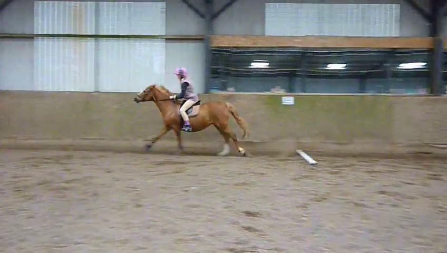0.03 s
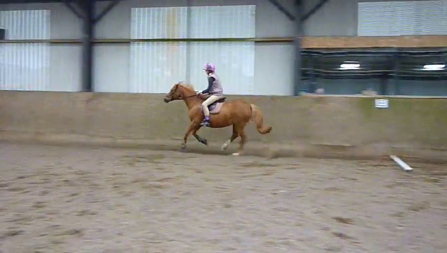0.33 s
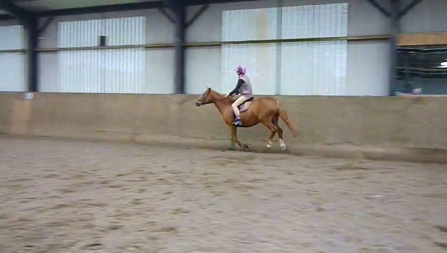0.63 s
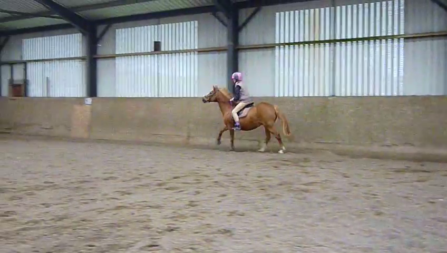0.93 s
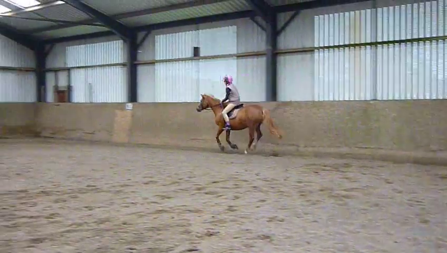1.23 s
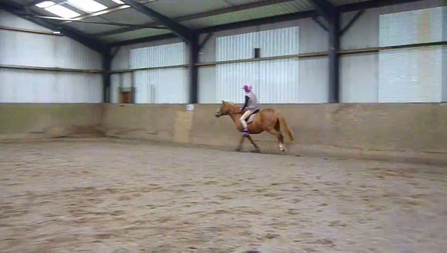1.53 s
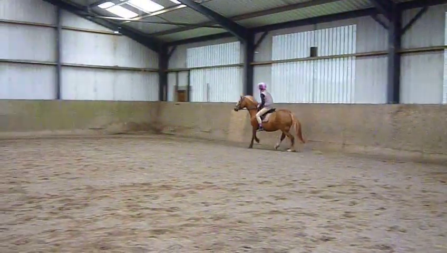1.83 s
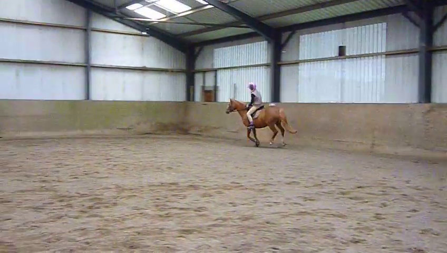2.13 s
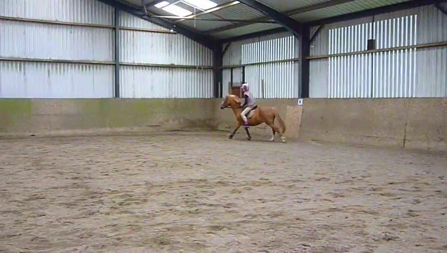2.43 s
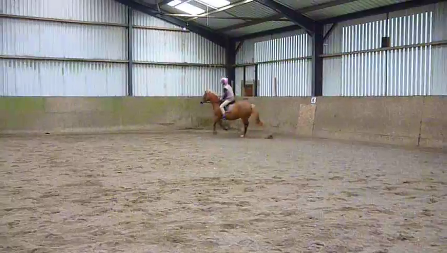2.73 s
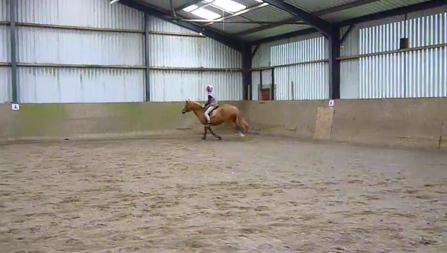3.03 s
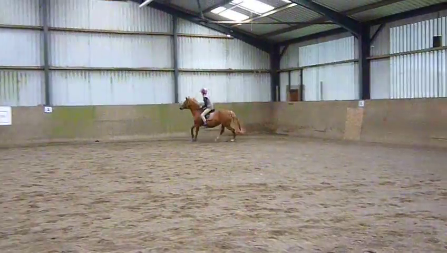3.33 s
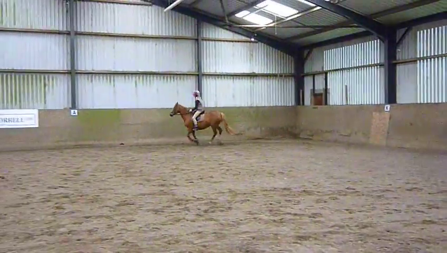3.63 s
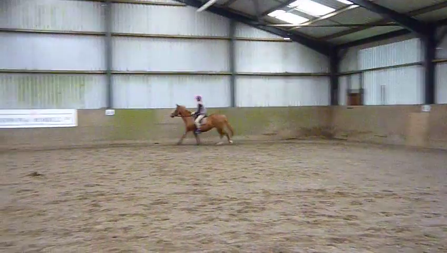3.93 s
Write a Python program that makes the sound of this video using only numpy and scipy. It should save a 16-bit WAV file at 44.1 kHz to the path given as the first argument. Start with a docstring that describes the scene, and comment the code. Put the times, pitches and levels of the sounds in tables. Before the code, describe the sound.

A pony canters on packed sand, about two strides a second, with dull thuds and soft scuffs. At about 0.2 seconds a clod knocks on the boards. The heaviest steps land around 1 second, echoing into a low rumble in the hall. The hoofbeats then grow unevenly fainter until 4 seconds, briefly stronger near 2.5. Light tack ticks and a steady, rain-like wash from the roof continue throughout.

```python
"""An even wash of noise from the roof fills a steel riding hall with a sand floor.
From the first moment a pony canters away along the wall, about two strides a second: each hoof thuds
in the packed footing and throws up sand. Early on a clod knocks on the boards; the tack ticks throughout.
The heaviest steps land after about a second, and the hall draws them out into a rumble.
Then the hoofbeats grow unevenly fainter while the wash carries on."""
import sys
import numpy as np
from scipy import signal
from scipy.fft import rfft, irfft
from scipy.io import wavfile
from scipy.ndimage import uniform_filter1d

SR = 44100
rng = np.random.default_rng(int(sys.argv[2]) if len(sys.argv) > 2 else 0)


def wav_record(signal):
    """Record a signal, one row per channel, as 16-bit PCM in the file named by sys.argv[1]."""
    frames = np.transpose(np.atleast_2d(signal))
    bounded = np.clip(frames, -1, 1)
    # unit amplitude maps onto the largest positive 16-bit level
    quanta = np.round(bounded * 32767).astype(np.int16)
    wavfile.write(sys.argv[1], SR, quanta)


N = 4 * SR
BIN_HZ = np.arange(N // 2 + 1) * SR / N


def undb(db):
    """The decibel scale: 20 dB is a factor of ten in amplitude."""
    return 10 ** (np.asarray(db) / 20)


def unit_rms(x):
    """Normalisation to an rms of 1."""
    return x / np.sqrt(np.mean(x ** 2))


def on_log(points, hz):
    """Interpolation of (frequency_hz, value) points on a log-frequency axis."""
    points_hz, values = np.array(points, float).T
    return np.interp(np.log(hz + 1e-3), np.log(points_hz), values)


def since(start_s):
    """Causal time: seconds after an onset, 0 before it."""
    return np.maximum(np.arange(N) / SR - start_s, 0)


def burst(start_s, rise_s, decay_s):
    """Exponential decay after a smooth attack, with a peak of 1."""
    t = since(start_s)
    envelope = (1 - np.exp(-(t / rise_s) ** 2)) * np.exp(-t / decay_s)
    return envelope / (envelope.max() + 1e-12)


def swell(start_s, rise_s, sharpness=4.2):
    """A gamma envelope: a rounded push that peaks at 1 after the rise time."""
    t = since(start_s) / rise_s
    return (t * np.exp(1 - t)) ** sharpness


def drift(rate_hz):
    """Random modulation: straight glides between Gaussian values, with a spread near 1."""
    span = int(SR / rate_hz)
    steps = np.repeat(rng.standard_normal(N // span + 1), span)
    return 1.28 * uniform_filter1d(steps, span)[:N]


def noise(spectrum, grain_db=0, transpose=1):
    """Spectral shaping of noise, rms 1; grain makes it a patter of uneven particles."""
    particles = rng.standard_normal(N) * undb(grain_db * rng.exponential(size=N))
    colour = undb(on_log(spectrum, BIN_HZ / transpose))
    high_pass = BIN_HZ ** 2 / (BIN_HZ ** 2 + 20 ** 2)
    return unit_rms(irfft(rfft(particles) * colour * high_pass, N))


def resonance(hz, width_hz):
    """Random excitation of two like resonators in series: a steep-sided noise band of rms 1."""
    peak = signal.iirpeak(hz, hz / width_hz, fs=SR)
    band = signal.lfilter(*peak, rng.standard_normal(N))
    return unit_rms(signal.lfilter(*peak, band))


# Spectrum of the wash: frequency_hz, density_db
WASH_SPECTRUM = [(21, -32.5), (35, -19), (54, -21), (85, -11), (120, -5), (200, -2), (310, -6), (420, -9),
                 (620, -10.5), (850, -12.5), (1100, -14), (1450, -14.5), (1800, -16), (2300, -19),
                 (2900, -22.5), (4300, -25), (6000, -26.5), (8000, -29)]
# Faint resonances of the hall: centre_hz, width_hz, level_db
HALL_RESONANCES = [(1422, 200, -65), (2420, 130, -75.5)]
# Slow contour of the wash: time_s, gain_db
WASH_CONTOUR = [(0, 6), (.1, 2), (0.301, 4.5), (.5, 1.5), (0.901, 1.5), (1.25, 2.5), (1.7, 1.8), (2.2, 1),
                (3.301, 0.5), (3.899, 1), (4, 1.5)]


def roof_wash():
    """Broadband noise with resonance: a finely grained wash from the roof rings faintly in the hall."""
    level_db = -47 + 0.5 * drift(rate_hz=20)
    wash = undb(level_db) * noise(WASH_SPECTRUM, grain_db=2.22)
    ringing = sum(undb(db) * resonance(hz, width_hz) for hz, width_hz, db in HALL_RESONANCES)
    contour_db = np.interp(since(0), *np.array(WASH_CONTOUR).T)
    return (wash + ringing) * undb(contour_db)


# Deep swells in the hall: start_s, level_db, rise_s
RUMBLES = [(.46, -52.5, 0.13), (.92, -47.5, 0.077), (1.08, -50.5, 0.14), (3.5, -56.5, 0.046)]


def hall_rumble():
    """Low-frequency resonance: the hall swells with a rumble around some of the strides."""
    envelope = sum(undb(db) * swell(start_s, rise_s) for start_s, db, rise_s in RUMBLES)
    return resonance(hz=97.5, width_hz=40) * envelope


# Reverberation time of the hall: frequency_hz, t60_s
REVERB_TIMES = [(80, 0.78), (200, 1.3), (500, 0.89), (1500, 0.36), (4000, 2.6), (9000, .5)]


def reverberation(sound):
    """Convolution with a diffuse tail, in which each octave band decays at its own rate."""
    t = since(0.012)  # delay of the first reflection
    white, tail = rfft(rng.standard_normal(N)), 0
    octave = np.clip(np.log2((BIN_HZ + 1) / 62.5), 0, 7)
    for k in range(8):
        band = irfft(white * np.maximum(1 - abs(octave - k), 0), N)
        t60_s = on_log(REVERB_TIMES, 62.5 * 2 ** k)
        tail += band * np.exp(-np.log(1000) * t / t60_s)
    tail *= 1 - np.exp(-t / 0.013)  # the reflections build up
    bass = rfft(tail)[(BIN_HZ > 100) & (BIN_HZ < 500)]
    bass_gain = np.sqrt(np.mean(abs(bass) ** 2))
    return signal.fftconvolve(sound, tail / bass_gain)[:N] * undb(-1.5)


# Scuffs, rustles and a squeak: start_s, level_db, centre_hz, width_hz, rise_s
RUBS = [(0, -44.5, 2220, 140, 0.016), (0, -55, 2200, 600, 0.13), (.15, -49, 600, 202, 0.065),
        (.3, -52, 900, 1500, 0.03), (.645, -50, 930, 160, 0.025), (.66, -59, 6400, 3500, 0.052),
        (1.06, -52, 600, 640, 0.077), (1.125, -48.5, 806, 700, 0.019), (1.13, -64, 4500, 447, 0.14),
        (1.545, -43, 387, 198, 0.015), (1.56, -53.5, 1460, 896, 0.14), (2.52, -56, 650, 302, 0.049),
        (2.97, -51.5, 330, 350, 0.1), (3.044, -52.5, 1390, 1000, 0.046), (3.515, -50, 520, 450, 0.057),
        (3.671, -52, 1310, 400, .045), (3.94, -55.5, 3970, 4530, 0.039)]


def scuffs():
    """Friction: sand and tack rub softly in bands of noise that swell and fade."""
    return sum(undb(db) * swell(start_s, rise_s) * resonance(hz, width_hz)
               for start_s, db, hz, width_hz, rise_s in RUBS)


def cracks(contacts, spectrum):
    """Impact transients: each hard contact gives a sudden burst of noise that dies quickly."""
    rise_s = 0.000055
    envelope = sum(undb(db) * burst(start_s, rise_s, decay_s) for start_s, db, decay_s, *_ in contacts)
    return noise(spectrum) * envelope


# Contacts of tack and grit: start_s, level_db, decay_s
TACK_CONTACTS = [(.1406, -49.5, 0.01), (.1989, -50, .002), (.2443, -49, .014), (.6155, -47, 0.0042),
                 (.7532, -45, .004), (1.195, -53.5, .015), (1.9056, -46.5, 0.024), (2.077, -52, 0.0017),
                 (2.4783, -49, 0.0055), (2.6663, -47, 0.0033), (2.728, -47, 0.0014), (3.7673, -48.5, .002)]
# Spectrum of a tick: frequency_hz, density_db
TICK_SPECTRUM = [(500, -31), (2000, -7.5), (3800, 0.5), (5500, 1.5), (7000, -0.5), (9000, -5)]


def tack_ticks():
    """Brief contact makes a bright sound: tack and grit tick in the treble."""
    return cracks(TACK_CONTACTS, TICK_SPECTRUM)


# Clod impacts on the boards: start_s, level_db, crack_decay_s, knock_gain_db
CLOD_IMPACTS = [(.2272, -28, 0.0035, 0), (.2355, -34, 0.011, -5), (.2445, -38, 0.009, -5)]
# Spectrum of their crack: frequency_hz, density_db
CLOD_SPECTRUM = [(100, -17), (400, 13), (750, 8), (950, -1), (1450, 6.5), (1800, -24.5), (2400, 3.5),
                 (3000, -10.5), (4300, -15.5), (6000, -21), (9000, -30)]
# Modes of the boards: frequency_hz, gain_db, t60_s
WALL_MODES = [(620, -5, .022), (1480, 0, .018), (2480, -3, .012), (4100, -10, .007)]


def clod_on_boards():
    """Modal vibration: each impact cracks and knocks the boards into a short, damped ring."""
    ringing = 0
    for start_s, db, _, knock_db in CLOD_IMPACTS:
        t = since(start_s)
        for hz, mode_db, t60_s in WALL_MODES:
            decay = np.exp(-np.log(1000) * t / t60_s)
            ringing += undb(db + knock_db + mode_db) * np.sin(2 * np.pi * hz * t) * decay
    return cracks(CLOD_IMPACTS, CLOD_SPECTRUM) + ringing


# Hoof falls: start_s, level_db, pitch_hz, sink_s, crunch_gain_db, hall_gain_db
HOOF_FALLS = [(0.048, -46, 297, 0.021, 7, -2.5), (0.128, -33.5, 231, 0.012, -3, 0),
              (0.173, -37.5, 139, 0.013, -11, -3.5), (0.222, -36.5, 113.5, 0.016, -0.5, -10.5),
              (0.268, -37, 289, 0.015, -5, -5.5), (0.448, -37.5, 149, 0.011, 3.5, -2.5),
              (0.486, -43, 331, 0.023, -0.5, 4.5), (0.597, -35.5, 156, 0.014, -12, 2),
              (0.938, -25, 177, 0.019, -14, -10.5), (0.978, -32, 158, 0.014, -18, -24),
              (1.014, -45.5, 274, 0.0071, 3, -10), (1.069, -24.5, 185, 0.017, -11, -5.5),
              (1.106, -35.5, 150.3, 0.025, -11, 6), (1.14, -38, 324.6, 0.022, -4, -3.5),
              (1.2, -40.5, 290, 0.015, -10, -6.5), (1.312, -39, 198.3, 0.021, -6, 6),
              (1.545, -33, 197, 0.011, -16, -8), (1.583, -34.5, 166, 0.015, -9, 1),
              (1.788, -46, 153, 0.019, -4, -9), (1.927, -39, 168, 0.0088, -8.5, -11),
              (2.019, -53, 204, 0.024, 2, 5), (2.11, -42, 202, 0.028, -15, -7),
              (2.426, -42.5, 190, 0.02, -3, -1), (2.53, -30, 230, 0.016, -10, -5),
              (2.555, -35.5, 301, 0.012, -4, -4.5), (2.586, -41, 328, 0.011, -1, 2),
              (2.605, -37, 218, 0.011, -11, -1), (2.909, -44, 200, 0.013, 0.5, -6),
              (3.009, -44, 239, 0.019, 1, -17), (3.048, -42, 313, .02, 0.5, -19),
              (3.415, -45.5, 195.4, 0.028, -1.5, 0.5), (3.521, -46.5, 346, 0.025, 5, -13),
              (3.565, -40, 201, 0.0066, -8, -7), (3.599, -46, 210, 0.014, 2.5, -11),
              (3.898, -49, 132, 0.011, -19, 7), (3.926, -34, 188, 0.014, -28, 4)]
# Crunch of packed footing at a ground pitch of CRUNCH_PITCH_HZ: frequency_hz, density_db
CRUNCH_SPECTRUM = [(30, -24), (70, -16), (130, 4), (220, 1), (350, 0), (550, -11.5), (1200, -27.5),
                   (3000, -33), (9000, -46)]
CRUNCH_PITCH_HZ = 182
# Spectrum of thrown sand: frequency_hz, density_db
SAND_SPECTRUM = [(200, -13.5), (600, 10), (1500, 4), (3000, -19.5), (6000, -19.5), (9000, -18)]


def hoofbeats():
    """Damped oscillation and granular noise: each hoof swings the ground, crunches it and throws sand."""
    direct, to_hall, spray_power = 0, 0, 0
    for start_s, db, pitch_hz, sink_s, crunch_db, hall_db in HOOF_FALLS:
        ground = np.sin(2 * np.pi * pitch_hz * since(start_s))
        thud = undb(db) * swell(start_s, sink_s, sharpness=3.7) * ground
        footing = noise(CRUNCH_SPECTRUM, transpose=(pitch_hz / CRUNCH_PITCH_HZ) ** 0.21)
        crunch = undb(db + crunch_db) * footing * burst(start_s, rise_s=0.0095, decay_s=2.3 * sink_s)
        direct += thud + crunch
        to_hall += undb(hall_db) * (undb(-3) * thud + crunch)
        spray = undb(0.55 * db) * burst(start_s, rise_s=0.021, decay_s=0.14)  # varies less than the thud
        spray_power += spray ** 2  # incoherent sources add in power
    sand = undb(-42) * np.sqrt(spray_power) * noise(SAND_SPECTRUM)
    return direct + sand, to_hall


def scene():
    """Superposition: direct sound, its reverberation and the background add in one channel."""
    hoofs, hoofs_to_hall = hoofbeats()
    clod, ticks = clod_on_boards(), tack_ticks()
    tail = reverberation(hoofs_to_hall + undb(-6) * clod + undb(-7.5) * ticks)
    return (hoofs + scuffs() + clod + ticks + tail + roof_wash() + hall_rumble())[None]


# Treble roll-off of the microphone: frequency_hz, gain_db
MIC_RESPONSE = [(6200, -2.5), (7200, -4.5), (7900, -8.5), (8300, -15.5), (8700, -25.5)]
CUTOFF_HZ, DC_OFFSET = 8800, -0.047


def record(dry):
    """Band limiting: a small camera rolls off the treble, cuts the top and adds a constant offset."""
    dull = irfft(rfft(dry) * undb(on_log(MIC_RESPONSE, BIN_HZ)), N)
    low_pass = signal.firwin(401, CUTOFF_HZ, window=("kaiser", 7), fs=SR)
    return signal.fftconvolve(dull, low_pass[None], mode="same", axes=1) + DC_OFFSET


dry = scene()
out = record(dry)
wav_record(out)
```